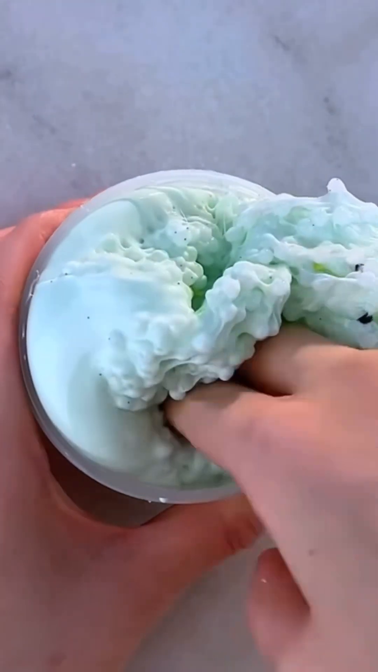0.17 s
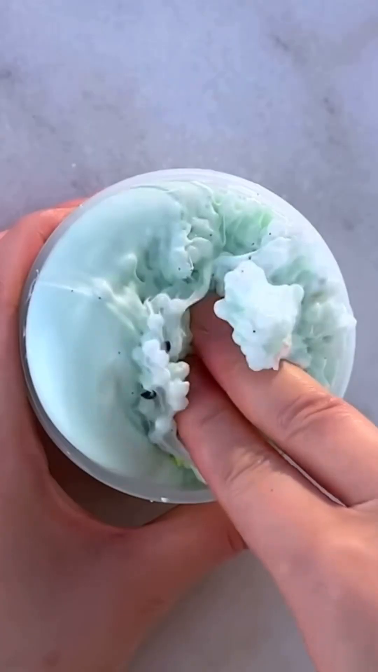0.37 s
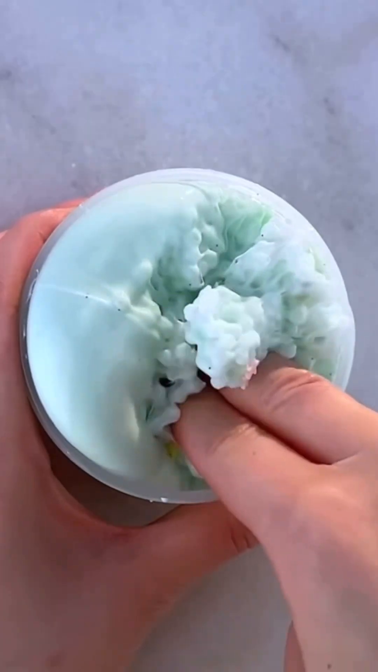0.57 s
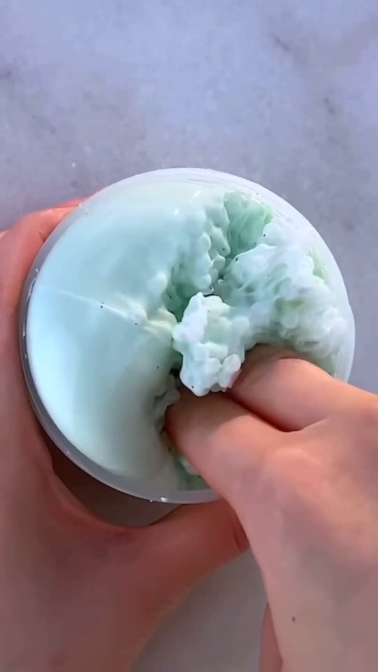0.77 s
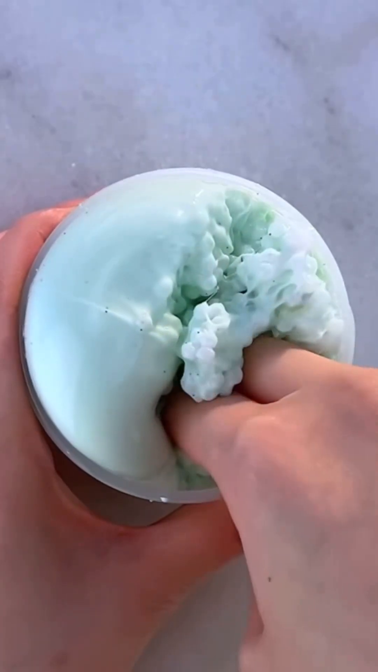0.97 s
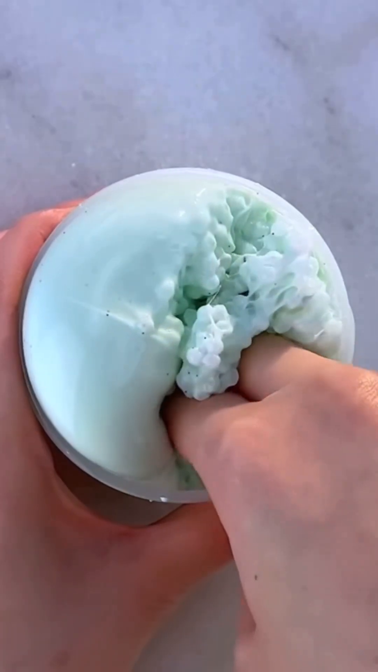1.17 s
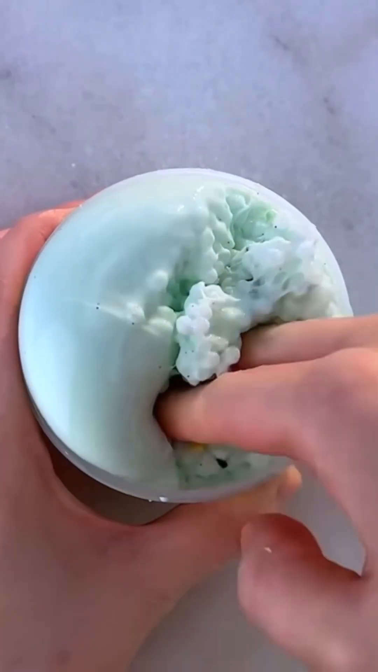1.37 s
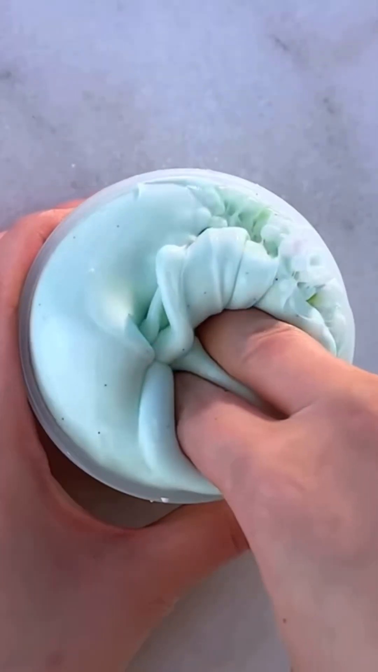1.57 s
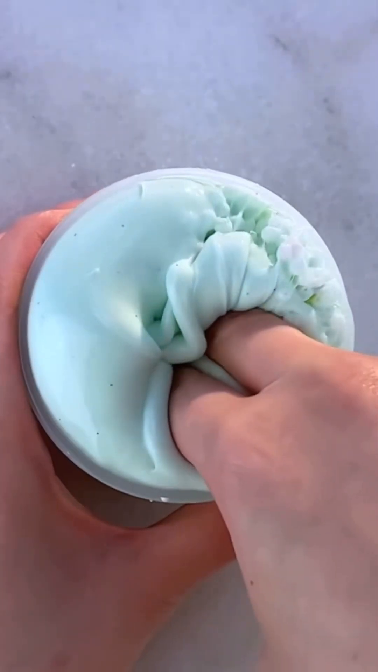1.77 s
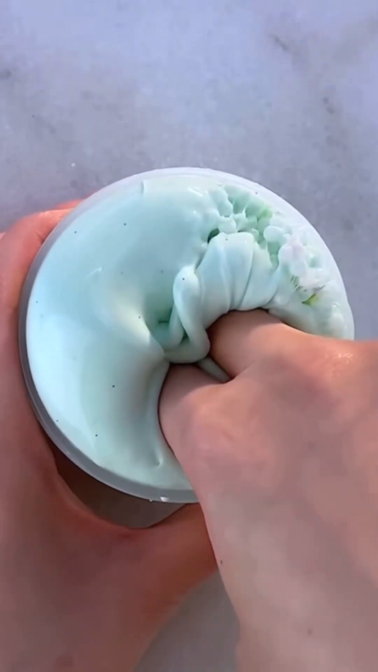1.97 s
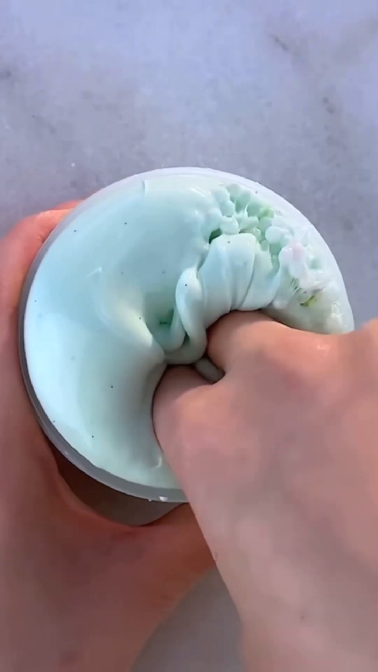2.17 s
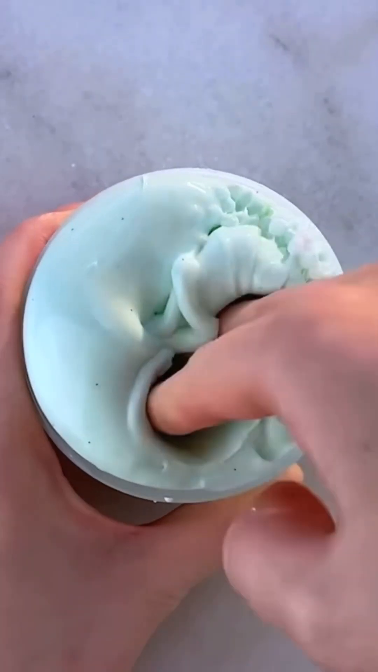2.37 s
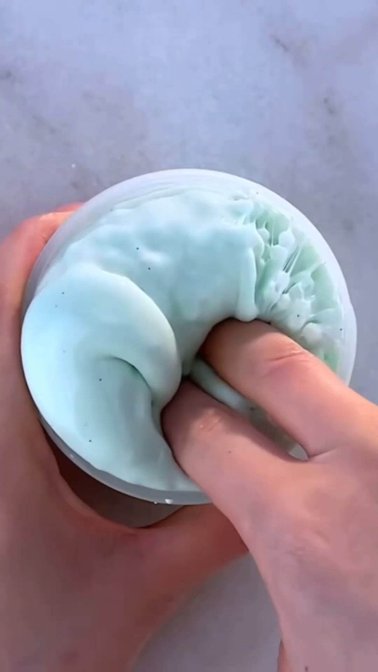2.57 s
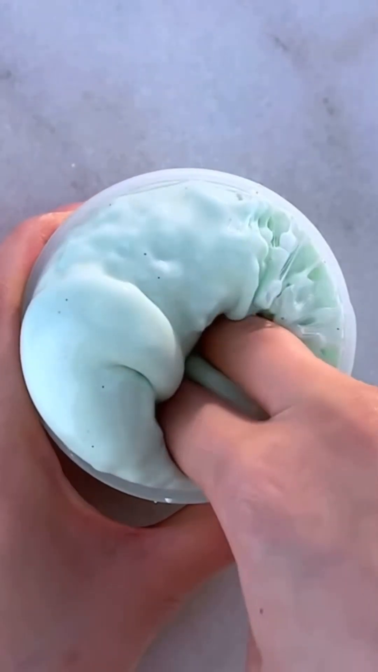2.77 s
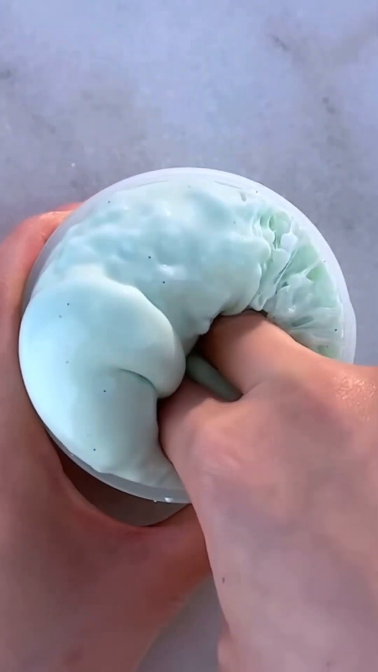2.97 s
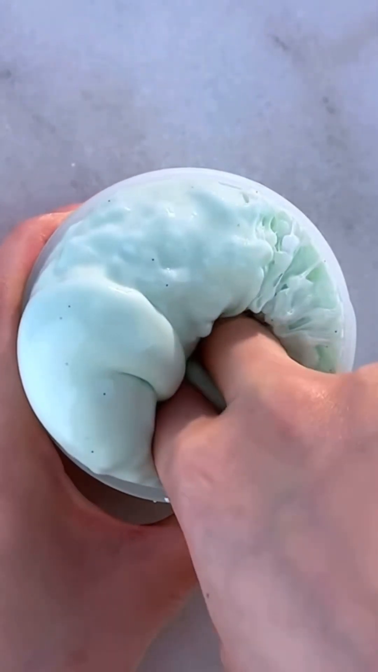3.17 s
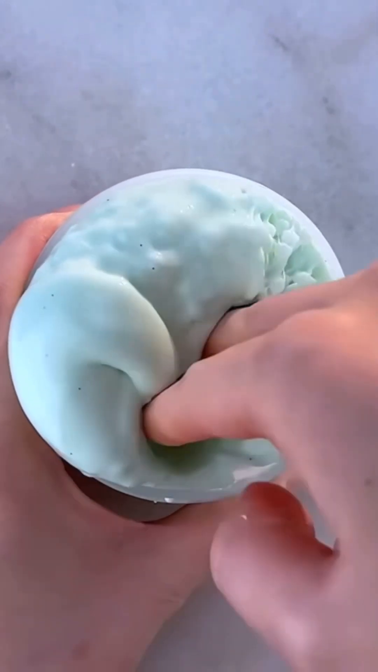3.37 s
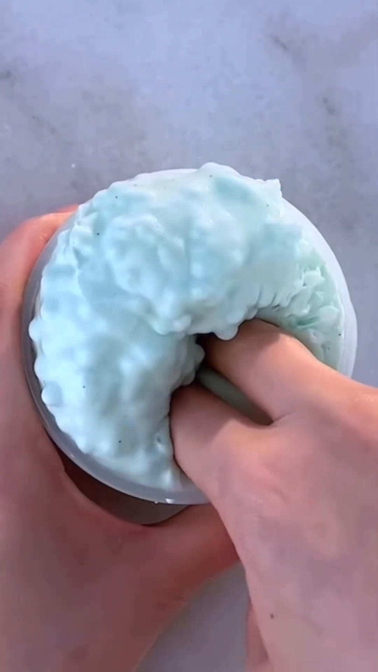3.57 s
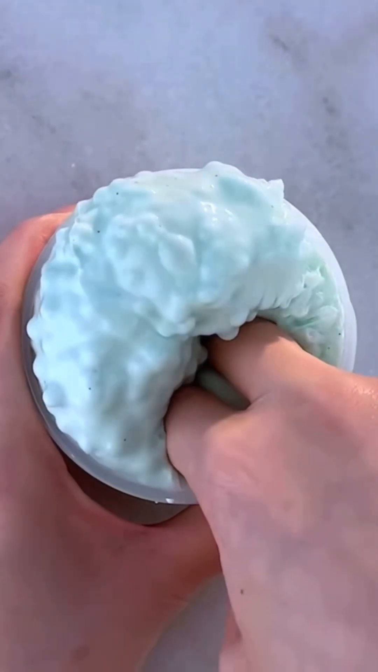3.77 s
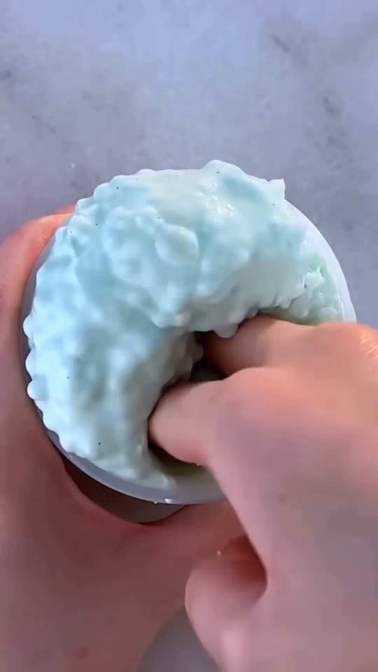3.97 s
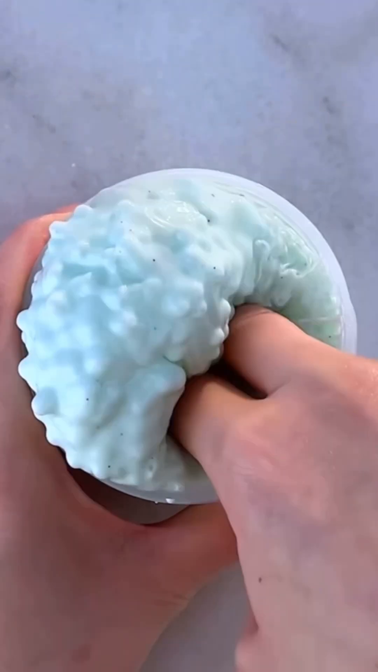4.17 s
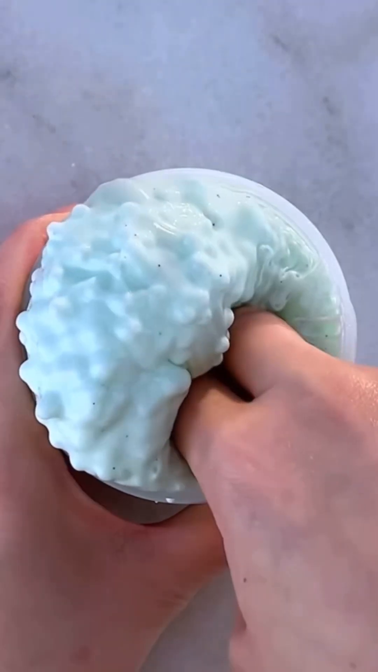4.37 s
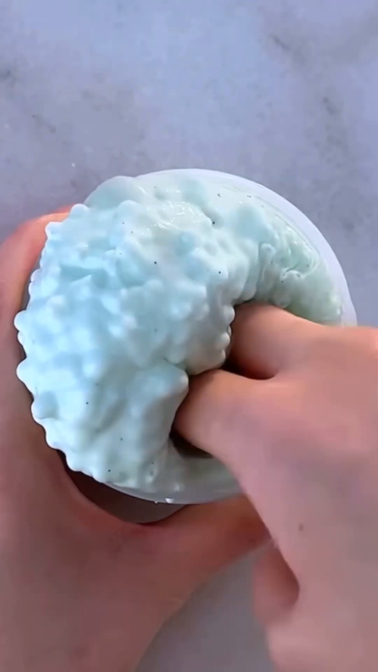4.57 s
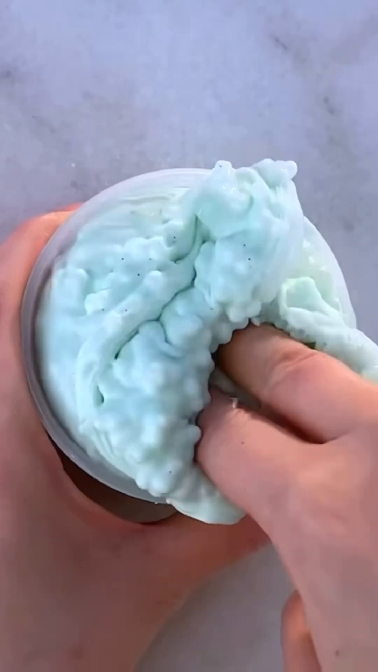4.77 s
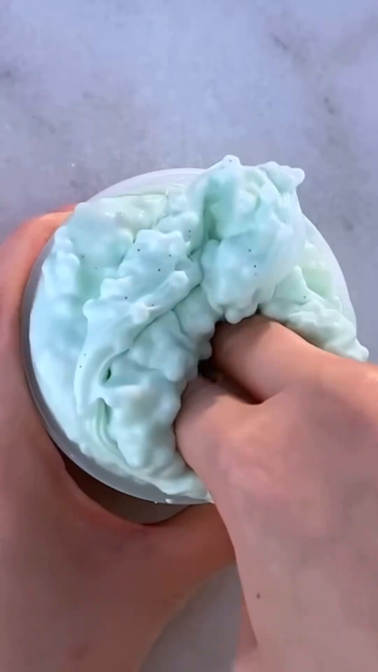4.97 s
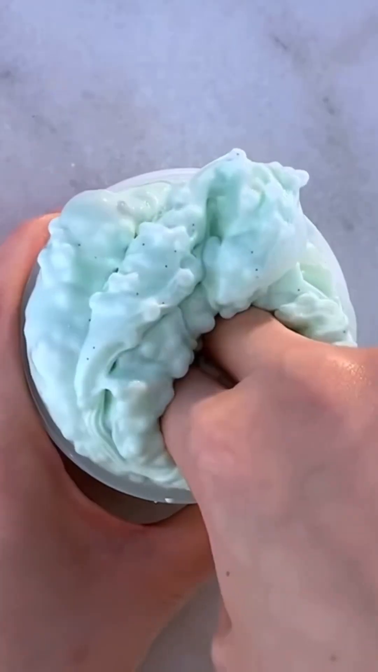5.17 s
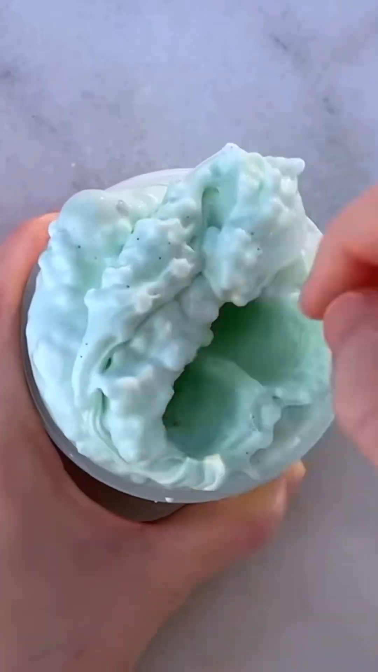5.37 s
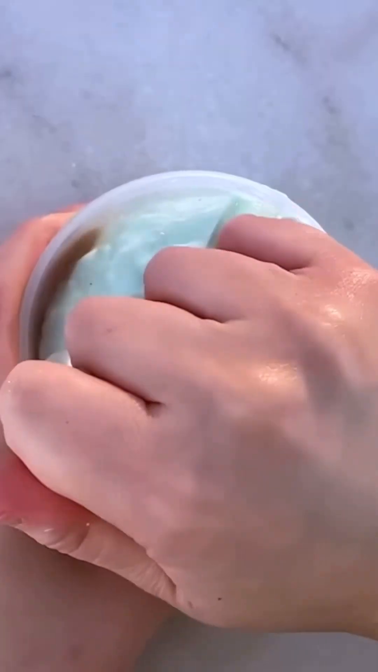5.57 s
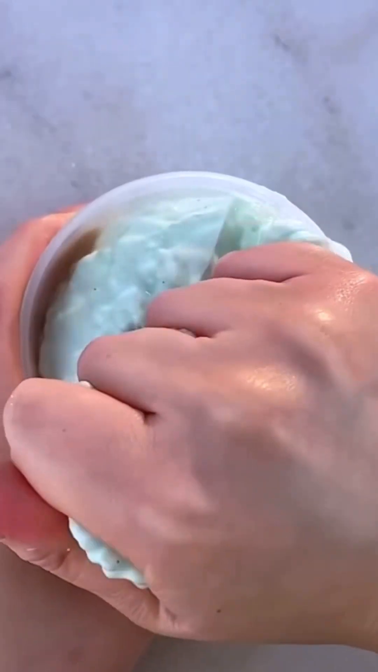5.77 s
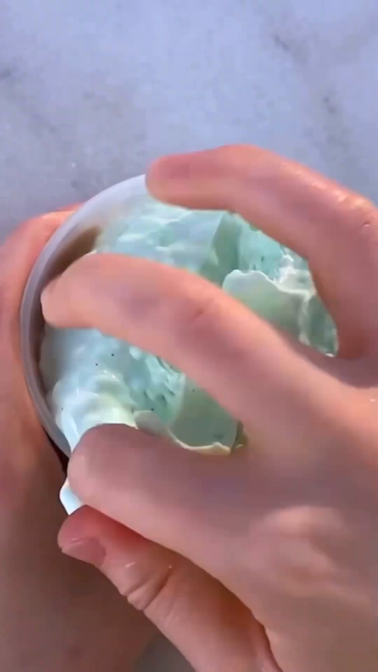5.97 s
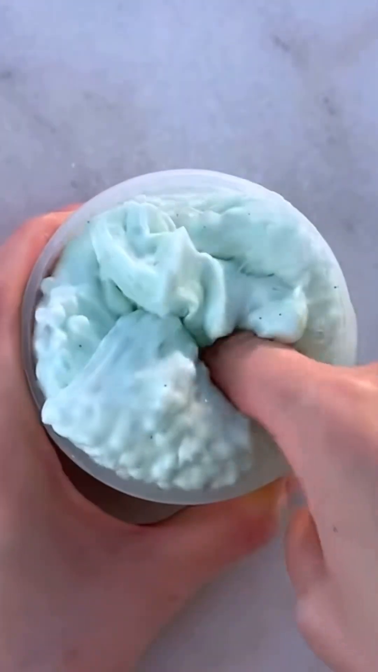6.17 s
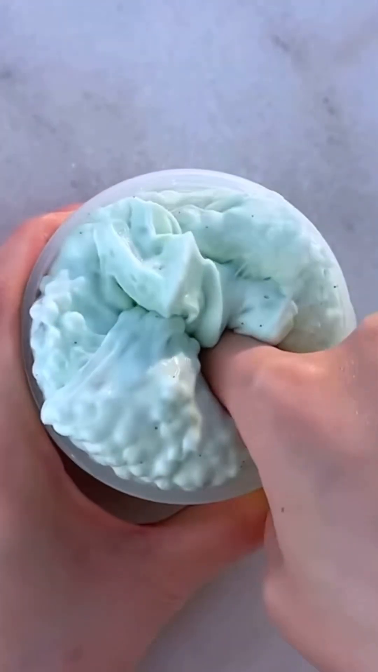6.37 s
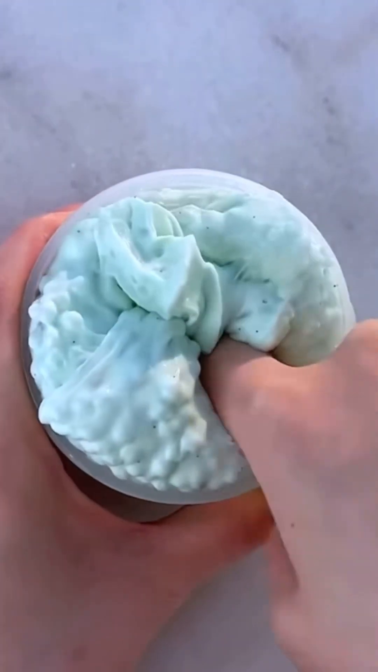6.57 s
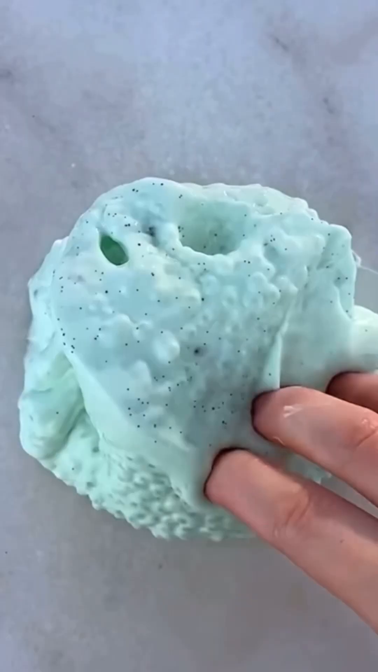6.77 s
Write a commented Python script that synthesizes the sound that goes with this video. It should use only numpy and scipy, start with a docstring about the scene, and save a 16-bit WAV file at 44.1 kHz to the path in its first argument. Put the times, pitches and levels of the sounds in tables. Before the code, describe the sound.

Close, wet slime pressing: bubbly crackling first, sparse ticks, then loud air pops with gurgles, ending in a dense bright crunch and a last squelch.

```python
"""In a small room, fingers knead a tub of thick slime close to a pair of microphone ports.
Each push squeezes air out: random tiny snaps pass through resonances as a gurgle, a squelch and a fizz.
Trapped pockets burst in short ringing tones and sprays of snaps, and small bubbles click and crackle.
Short grainy swells and dull thuds join in, over a rumble, a drone, a low hum and quiet room air."""
import sys
import numpy as np
from scipy import signal
from scipy.fft import rfft, irfft, next_fast_len
from scipy.io import wavfile
from scipy.ndimage import uniform_filter1d

SR = 44100
rng = np.random.default_rng(int(sys.argv[2]) if len(sys.argv) > 2 else 0)


def master_out(mix):
    """Clip the mix to full scale and print it as 16-bit PCM to the path in sys.argv[1]."""
    frames = np.transpose(np.atleast_2d(mix))
    ceiling = np.clip(frames, -1, 1)
    pcm = np.round(ceiling * 32767).astype(np.int16)
    wavfile.write(sys.argv[1], SR, pcm)


N = 300321
TIME = np.arange(N) / SR  # seconds


def amp(db):
    """Turns decibels into a gain."""
    return 10 ** (np.asarray(db) / 20)


def unit(x):
    """Scales a sound to rms 1."""
    return x / np.sqrt(np.mean(x ** 2) + 1e-20)


def read(points, hz):
    """Reads a table between its points, on a logarithmic frequency axis."""
    table_hz, value = np.transpose(points)
    return np.interp(np.log(hz + 1), np.log(table_hz + 1), value)


def add(mix, start_s, sound):
    """Mixes a sound in at a start time."""
    part = mix[..., max(round(start_s * SR), 0):][..., :sound.shape[-1]]
    part += sound[..., :part.shape[-1]]


def colour(x, spectrum, tilt=0, size=4096):
    """Filters with a spectrum, tilted in dB per octave; the filter has unit energy and never rings early."""
    hz = abs(np.fft.fftfreq(size, 1 / SR))
    gain_db = read(spectrum, hz) + tilt * np.log2(1 + hz / 500)
    log_gain = np.log(amp(gain_db))
    # the Hilbert transform finds the phase that lets the filter respond as early as possible
    response = np.exp(np.conj(signal.hilbert(log_gain)))
    taps = np.fft.ifft(response).real[:size // 2]
    taps = taps / np.linalg.norm(taps)
    return signal.oaconvolve(x, taps[None], axes=1)[:, :x.shape[1]]


def pair(z, spread):
    """Makes left and right from a shared signal z[0] and a share of an opposed one z[1]."""
    left, right = z[0] + spread * z[1], z[0] - spread * z[1]
    return np.array([left, right]) / np.sqrt(1 + spread ** 2)


def wander(count, hz):
    """Smooth random curve of rms 1 that moves at up to about hz."""
    size = next_fast_len(count)
    f = np.fft.rfftfreq(size, 1 / SR)
    smooth = rfft(rng.standard_normal(size)) * np.exp(-(f / hz) ** 2)
    return unit(irfft(smooth, size)[:count])


def grains(count, per_s, size_db, spread):
    """A random train of tiny snaps, few large and many small, each from its own direction."""
    chance, size, sign, side = rng.random((4, count))
    happens = chance < per_s / SR
    loudness = amp(size_db * np.minimum(-np.log(size + 1e-9), 4))
    train = happens * np.sign(sign - .5) * loudness
    return unit(pair([train, train * np.cos(2 * np.pi * side)], spread))


def resonate(x, hz, width):
    """Shifts the pitch hz down to zero, smooths twice and shifts back: a resonance that can move."""
    turn = np.exp(2j * np.pi * np.cumsum(hz) / SR)
    r = np.exp(-np.pi * width / SR)
    smooth = signal.lfilter([(1 - r) ** 2], [1, -2 * r, r * r], x / turn)
    return unit((turn * smooth).real)


def cavities(x, modes, drift, flutter_db, flutter_hz):
    """Soft cavities that change shape: each resonance drifts and swells on its own."""
    total = 0
    for hz, width, db in modes:
        swell = amp(db + flutter_db * wander(N, flutter_hz))
        pitch = hz * (1 + drift * wander(N, flutter_hz / 3))
        total = total + swell * resonate(x, pitch, width)
    return unit(total)


def gesture(start, end, rise_db_per_s, fall_db_per_s, sag_db_per_s=0):
    """Gain of one hand move: it builds up to start, holds or sags, and falls faster after end."""
    early, since, late = np.maximum([start - TIME, TIME - start, TIME - end], 0)
    drop_db = rise_db_per_s * early + sag_db_per_s * since + fall_db_per_s * late
    return amp(-np.minimum(drop_db, 200))


# spectrum of the quiet room air: (frequency_hz, strength_db)
AIR_SPECTRUM = [(20, -8.5), (50, 2), (80, -3.5), (300, -20.5), (700, -27.5), (1200, -31), (2300, -39.5),
                (3500, -40), (6000, -44.5), (12500, -38), (16000, -58)]


def ambience(hum_hz=57.8, hum_db=-44, air_db=-50):
    """Room air is filtered noise; the low hum is a sine whose phase and level waver."""
    phase = 2 * np.pi * hum_hz * TIME + 0.55 * wander(N, 1.7)
    hum = np.sin(phase) * (1 + .35 * wander(N, 7.3))
    air = colour(pair(rng.standard_normal((2, N)), 0.33), AIR_SPECTRUM)
    return amp(hum_db) * hum + amp(air_db) * air


# spectrum of the rumbling tub: (frequency_hz, strength_db)
RUMBLE_SPECTRUM = [(20, -12.5), (45, 0.5), (90, 3.5), (150, -2), (200, -9), (300, -14), (450, -20),
                   (700, -23), (1200, -43), (4000, -70.5)]
# resonances of the low drone: (pitch_hz, width_hz, level_db)
DRONE_RESONANCES = [(252.6, 57, -2.5), (380.3, 45, -10)]
# rumble between shoves: (time_s, level_db)
RUMBLE_CURVE = [(0, -50.5), (.55, -41.5), (1.75, -42.5), (2.7, -44.5), (3.65, -52.5), (4.4, -47),
                (5.1, -54), (5.6, -47.5), (6.35, -52), (6.81, -44.5)]
# how the drone comes and goes: (time_s, level_db)
DRONE_CURVE = [(0, -59), (.7, -47), (1.35, -48.5), (1.75, -41.5), (2.2, -49.5), (2.5, -57), (4, -54),
               (5.1, -66.5), (5.62, -50), (6.4, -61), (6.81, -57)]
PRESS_DB_PER_S = 700.5  # how fast the push builds, in air flow and in shove
SHOVE_LAG_S, SHOVE_RELEASE_DB_PER_S = 0.0087, 150.5  # the heavy mass follows late and settles slowly


def rumble():
    """The held tub rumbles as low noise, more with each shove; resonances in noise make a drone."""
    force = amp(np.interp(TIME, *np.transpose(RUMBLE_CURVE)))
    for start, hold, *_, shove_db in FINGER_PUSHES:
        late = start + SHOVE_LAG_S
        force += amp(shove_db) * gesture(late, late + hold, PRESS_DB_PER_S, SHOVE_RELEASE_DB_PER_S)
    shoves = colour(pair(rng.standard_normal((2, N)), 0.39), RUMBLE_SPECTRUM)
    drone_noise = pair(rng.standard_normal((2, N)), 0.17)
    drone = cavities(drone_noise, DRONE_RESONANCES, drift=0.04, flutter_db=2.0, flutter_hz=14)
    return shoves * force + drone * amp(np.interp(TIME, *np.transpose(DRONE_CURVE)))


# pulls on the sticky surface: (start_s, end_s, crackle_db, sizzle_db, slackening_db_per_s)
SURFACE_PULLS = [(0, .04, -65, -69, 5.5), (0.382, 1.095, -38.5, -42.5, 16.5),
                 (1.474, 1.97, -59.5, -72.5, 44), (2.178, 2.28, -62.5, -51, 10),
                 (2.594, 2.906, -60, -57.5, 9.5), (3.171, 3.352, -62, -62, 1.5),
                 (4.243, 4.399, -60.5, -65.5, 55.5), (4.75, 5.052, -48.5, -51.5, 13),
                 (5.45, 5.55, -50.5, -65, 8), (5.592, 5.787, -37, -30.5, 9), (5.968, 6.302, -67, -58.5, 27)]
# spectrum of the tiny ticks: (frequency_hz, strength_db)
CRACKLE_SPECTRUM = [(100, -28.5), (900, -14), (1600, 2.5), (2600, 0), (4000, -2), (6000, -1), (9000, -11.5),
                    (12500, 3), (14500, -7.5), (17000, -16.5)]
# spectrum of a single snap, also used by the clicks: (frequency_hz, strength_db)
SNAP_SPECTRUM = [(100, -23.5), (800, -11), (1800, 5.5), (4000, -2), (7000, 0.5), (12500, -0.5),
                 (15000, -14), (17000, -9)]
# spectrum of the sizzle, also used by the fizz of the pushes: (frequency_hz, strength_db)
FIZZ_SPECTRUM = [(100, -57.5), (5000, -26.5), (8000, -11.5), (10000, 5), (12500, 1), (15000, -6),
                 (17000, -13)]
# resonances of the wet gaps, also used by the pushes: (pitch_hz, width_hz, level_db)
WET_GAPS = [(1550, 360, 0.5), (3300, 2800, -0.5), (5800, 3300, -6.5)]
GRIP_DB_PER_S, LET_GO_DB_PER_S = 419.5, 241  # rise before a pull, extra fall after it
REST_CRACKLE_DB, REST_SIZZLE_DB = -72, -79.5  # the foam settling by itself


def crackle(wet_db=-7, clump_db=6.5, stray_db=-8):
    """The stretched surface lets go of the skin in clumps of ticks, wet rings, stray snaps and sizzle."""
    gains = amp([[REST_CRACKLE_DB], [REST_SIZZLE_DB]]) * np.ones(N)
    for start, end, crackle_db, sizzle_db, slackening in SURFACE_PULLS:
        pull = gesture(start, end, GRIP_DB_PER_S, LET_GO_DB_PER_S, slackening)
        gains += amp([[crackle_db], [sizzle_db]]) * pull
    clumps = amp(clump_db * wander(N, 50))
    ticks = unit(colour(grains(N, per_s=600, size_db=4.5, spread=.6) * clumps, CRACKLE_SPECTRUM))
    wet_snaps = grains(N, per_s=400, size_db=0.5, spread=0.7)
    wet = cavities(wet_snaps, WET_GAPS[1:], drift=.2, flutter_db=7.5, flutter_hz=80)
    stray = colour(grains(N, per_s=45, size_db=2.5, spread=.6), SNAP_SPECTRUM, tilt=2)
    sizzle = unit(colour(grains(N, per_s=1000, size_db=4.5, spread=0.31) * clumps, FIZZ_SPECTRUM))
    coarse = unit(ticks + amp(wet_db) * wet + amp(stray_db) * stray)
    return coarse * gains[0] + sizzle * gains[1]


# bubble snaps that stand out: (start_s, level_db averaged over one millisecond, tilt_db_per_octave)
BUBBLE_CLICKS = [(.0362, -48, 0), (.3565, -17, 9.5), (.391, -21, 7.5), (.4122, -20, 6), (.4224, -16.5, 3.5),
                 (.4307, -21.5, 0), (.4981, -22.5, 4), (.5025, -9.5, 22), (.6368, -22.5, 0),
                 (.6391, -18, 0.5), (.6947, -17.5, -3.5), (.7591, -27.5, 2), (.8046, -31.5, 3),
                 (.8751, -27.5, 10.5), (0.8236, -33.5, -5), (0.857, -33, 4), (.9188, -28, -3),
                 (1.0222, -33, 5), (1.0782, -32.5, 5.5), (1.197, -39, -1), (1.4824, -21.5, -1.8),
                 (1.5898, -40, -1), (1.7563, -37.5, -19.5), (1.8821, -38.5, -21), (2.0889, -28, 4.5),
                 (2.1859, -27, -11.5), (2.6262, -39.5, -1), (2.6386, -40, -3), (2.6792, -20, 17.5),
                 (2.7729, -31.5, 10), (2.8295, -37.5, 13), (2.8514, -32, -4.5), (2.906, -30.5, 11),
                 (3.177, -44.5, 7), (3.5617, -45, -3), (3.7147, -46.5, -5), (4.198, -41.5, -0.5),
                 (4.247, -32.5, 5), (4.4953, -20.5, 2), (4.7537, -27.5, 2), (4.9169, -28, 5.5),
                 (4.9624, -23, -8), (5.0133, -29, 14), (5.0696, -27.5, 8), (5.2106, -27, -7.5),
                 (5.5105, -5, 8), (5.6573, -9, 18.5), (5.6808, -7.5, 7), (6.0305, -38, 9),
                 (6.1448, -21, 14.5), (6.79, -15.5, 13.5)]


def clicks(spit=0.92):
    """A small bubble snaps as one impulse and spits a brief burst of noise, each with its own brightness."""
    out, t = np.zeros((2, N)), TIME[:SR // 40]
    fade = np.exp(-t / .0004)
    for start, db, tilt in BUBBLE_CLICKS:
        spray = pair(rng.standard_normal((2, len(t))), 0.41) * fade
        snap = colour((t == 0) + spit * spray, SNAP_SPECTRUM, tilt)
        add(out, start, amp(db) * snap / np.linalg.norm(snap[0]))
    return out * np.sqrt(SR / 1000)  # energy of one millisecond


# pushes of the fingers, start being full pressure:
# (start_s, hold_s, release_db_per_s, gurgle_db, squelch_db, fizz_db, shove_db)
FINGER_PUSHES = [(0.115, 0.082, 520, -45.5, -39.5, -40, -59), (1.279, 0.094, 510, -45, -39, -36, -46),
                 (2.283, 0.071, 254, -35.5, -39.5, -37, -40), (3.294, 0.056, 227, -24, -38.5, -32.5, -29.5),
                 (3.987, 0.023, 270, -25.5, -29, -29.5, -32), (4.503, 0.081, 378, -32, -34, -35, -43),
                 (5.235, 0.049, 520, -31, -28, -27, -39), (5.878, 0.06, 421, -40, -25, -25.5, -43),
                 (6.634, 0.021, 447, -25, -26.5, -26, -39)]
# resonances of the gurgle: (pitch_hz, width_hz, level_db)
GURGLE_RESONANCES = [(430, 250, -0.77), (663, 210, -0.23)]
# spectrum of the rasp in the squelch: (frequency_hz, strength_db)
SQUELCH_SPECTRUM = [(100, -19.5), (600, -7.5), (1100, -4), (2200, -1.5), (4500, -8), (7000, -3.5),
                    (9500, -25), (16000, -39.5)]
GURGLE_SAG_DB_PER_S = 90.5  # the large gaps close first


def pushes(flutter_db=1.5, gaps_db=-6, rasp_db=-3):
    """Air sputters through wet gaps beside the fingers: a gurgle, a squelch and a fine fizz on top."""
    gains = np.zeros((3, N))
    for start, hold, release, gurgle_db, squelch_db, fizz_db, _ in FINGER_PUSHES:
        end = start + hold
        flow = gesture(start, end, PRESS_DB_PER_S, release)
        sagging_flow = gesture(start, end, PRESS_DB_PER_S, release, GURGLE_SAG_DB_PER_S)
        gains[0] += amp(gurgle_db) * sagging_flow
        gains[1:] += amp([[squelch_db], [fizz_db]]) * flow
    sputter = grains(N, per_s=2800, size_db=5.0, spread=.55)
    gurgle = cavities(sputter, GURGLE_RESONANCES, drift=.12, flutter_db=5, flutter_hz=60)
    gaps = cavities(sputter, WET_GAPS, drift=0.079, flutter_db=3.5, flutter_hz=49.7)
    rasp = colour(grains(N, per_s=3500, size_db=2.5, spread=0.38), SQUELCH_SPECTRUM)
    squelch = amp(gaps_db) * gaps + amp(rasp_db) * rasp
    fizz = colour(grains(N, per_s=15000, size_db=5.5, spread=0.08), FIZZ_SPECTRUM)
    flutter = amp(flutter_db * wander(N, 110))
    return (gurgle * gains[0] + squelch * gains[1] + fizz * gains[2]) * flutter


# short grainy swells: soft squishes, and the tub's hollow ring after the big bursts;
# each lasts from length_s before the middle to length_s after:
# (middle_s, level_db, pitch_hz, width_hz, length_s)
GRAINY_SWELLS = [(0.165, -40.5, 1600, 1300, .08), (.663, -34.5, 3000, 1800, .027),
                 (1.761, -57.5, 2000, 1200, .04), (1.898, -59, 1570, 1000, .046),
                 (2.366, -43.5, 1550, 250, .06), (3.08, -56.5, 1670, 1003, .053),
                 (3.366, -36, 1550, 250, .05), (3.421, -48.5, 3200, 1410, .11),
                 (4.034, -37, 1720, 335, .05), (4.1, -55, 1525, 230, .06), (4.108, -49, 4720, 2480, .11),
                 (4.854, -40, 2660, 2440, .054), (5.294, -30.5, 1700, 1500, .019),
                 (6.644, -22, 3460, 1460, .02)]


def swells(spread=0.846):
    """Tiny snaps through one resonance swell and fade: a soft squish, or the tub's hollow ring."""
    out = np.zeros((2, N))
    for middle, db, hz, width, length in GRAINY_SWELLS:
        count = round(2 * length * SR)
        snaps = grains(count, per_s=1000, size_db=2, spread=spread)
        rasp = resonate(snaps, np.full(count, hz), width)
        add(out, middle - length, amp(db) * rasp * np.hanning(count))
    return out


def pocket_tone(db, hz, decay, rise, rough=0.28, waver=.1, attack=0.00017):
    """One tone of a cavity whose wall gives way; the flapping opening shakes pitch and level."""
    t = TIME[:4096]
    climb = 2 ** (rise * (1 - np.exp(-t / (2 * decay))))
    pitch = hz * climb * (1 + waver * wander(len(t), hz / 3))
    ring = np.sin(2 * np.pi * np.cumsum(pitch) / SR) * (1 + rough * wander(len(t), hz / 4))
    ring *= np.exp(-t / decay) * (1 - np.exp(-t / attack))
    # a small opening radiates little below its own pitch
    return amp(db) * signal.lfilter(*signal.butter(2, hz / 2, "high", fs=SR), ring)


# ringing tones of bursting air pockets, several to a large burst:
# (start_s, level_db before shaping, pitch_hz at the start, decay_s)
POCKET_TONES = [(.692, -11, 2600, 0.00031), (.754, 3.5, 2220, 0.00023), (2.2207, -0.5, 910, 0.0016),
                (2.2224, 1.5, 2258, 0.011), (2.228, -3, 2514, 0.0055), (2.269, -2, 3190, 0.0019),
                (2.340, -22.5, 755, 0.0076), (3.2573, 0.5, 2438, 0.0082), (3.257, -10.5, 692, 0.009),
                (3.2575, -3.5, 3266, 0.012), (3.285, -8.5, 3410, .008), (3.2865, -5.5, 750, 0.0032),
                (3.288, -2.5, 408, .0052), (3.348, -13.5, 575, 0.0076), (3.943, -2, 4910, 0.014),
                (3.944, -8.5, 400, 0.0045), (3.9712, -0.5, 1550, .0035), (3.972, -11, 840, 0.0042),
                (3.9727, -6.5, 420, 0.0051), (4.8442, -9, 2940, 0.00055), (4.961, -5.5, 2510, 0.00044),
                (5.881, -9, 2750, .004), (6.623, -9, 625, 0.0027), (6.6397, -20.5, 430, 0.009),
                (6.641, -13.5, 850, 0.0045), (6.641, -14.5, 2900, 0.0064)]
POCKET_RISE_OCTAVES = 0.12  # a cavity shrinks as it empties, so its pitch climbs


def pockets(spread=0.45):
    """Bursting air pockets ring, several tones to a large burst, each tone with its own direction."""
    out = np.zeros((2, N))
    for start, db, hz, decay in POCKET_TONES:
        front, side = (pocket_tone(db, hz, decay, POCKET_RISE_OCTAVES) for _ in range(2))
        direction = np.cos(2 * np.pi * rng.random())
        add(out, start, pair([front, direction * side], spread))
    return out


# films tearing in a spray of tiny snaps: (start_s, level_db, decay_s, tilt_db_per_octave)
FILM_TEARS = [(1.479, -27, 0.0056, 5), (2.214, -16, 0.0071, 5), (2.2225, -3, .007, -3),
              (2.2643, -13.5, 0.0063, -3), (2.269, -9, 0.0044, -4.5), (3.2562, -5.5, 0.01087, -2),
              (3.286, -10, 0.01, -3), (3.9425, -5, 0.0094, 0), (3.9705, -4, .006, -2.5),
              (4.52, -19, 0.0059, 0.5), (4.7175, -22.5, 0.0063, 3), (5.2443, -36, 0.0069, 11),
              (5.2509, -20.5, .009, -5.5), (5.439, -13.5, 0.0065, -0.5), (5.483, -22.5, 0.011, -0.5),
              (5.51, -14, 0.0067, 3.5), (5.5631, -5.5, 0.011, 5.5), (5.572, -3.5, .007, 14.5),
              (5.5867, -6.5, .002, 11), (5.6157, -2, 0.0098, 10), (5.672, -18.5, .005, -1.5),
              (5.6807, -9, 0.0053, 13), (5.741, -2.5, 0.007, 5), (5.881, -18, 0.0088, -1),
              (6.621, -4, 0.00213, -2), (6.640, -19, 0.0075, -6)]
# spectrum of the spray: (frequency_hz, strength_db)
TEAR_SPECTRUM = [(60, -13), (300, -7), (1200, -1.5), (3000, 0), (6000, -1), (9000, -2.5), (12500, -0.5),
                 (14500, -9.5), (17000, -18)]


def tears(edge=.0004, lead_db=-17, lead=0.0059):
    """A spray of many tiny snaps within a few milliseconds, with a faint short rise before it."""
    out, t = np.zeros((2, N)), TIME[:SR // 8] - TIME[SR // 50]  # zero is the start of the spray
    for start, db, decay, tilt in FILM_TEARS:
        faint_rise = amp(lead_db) * np.exp(-abs(t) / lead)
        burst = np.exp(-abs(t) / decay) * (1 - np.exp(-abs(t) / edge))
        swell = np.where(t < 0, faint_rise, burst)
        spray = grains(len(t), per_s=15000, size_db=4.5, spread=0.63) * swell
        add(out, start + t[0], amp(db) * colour(spray, TEAR_SPECTRUM, tilt))
    return out


# the mass of slime shoved against the tub: (start_s, level_db before fading, pitch_hz, decay_s)
SLIME_THUDS = [(2.224, -20.5, 63.36, 0.042), (2.27, -29.5, 153.7, 0.0086), (3.288, -20, 140.2, 0.019),
               (3.292, -12, 353.7, 0.0072), (3.324, -24.5, 60, 0.065), (3.989, -24.5, 107.4, 0.041),
               (5.256, -21.5, 83.4, 0.023), (5.259, -27.5, 372.6, 0.012), (5.31, -19, 75, 0.016),
               (5.985, -23, 78, 0.017), (6.69, -26.5, 72, 0.026)]


def thuds():
    """Dull, quickly damped wobbles of the whole mass: low sines with a wavering pitch."""
    out, t = np.zeros((2, N)), TIME[:SR // 4]
    for start, db, hz, decay in SLIME_THUDS:
        pitch = hz * (1 + 0.048 * wander(len(t), 40))
        wobble = np.sin(2 * np.pi * np.cumsum(pitch) / SR)
        add(out, start, amp(db) * wobble * np.exp(-t / decay) * (1 - np.exp(-t * hz)))
    return out


def reflections(x, t60, delay):
    """Echoes blur into a noise tail whose bands die at their own speeds; it fades in around delay."""
    hz, t, z = signal.stft(rng.standard_normal((2, SR // 2)), SR, nperseg=256)
    # each band falls by 60 dB in its own t60
    decay = np.exp(-np.log(1000) * t / read(t60, hz)[:, None])
    tail = signal.istft(z * decay, SR)[1]
    fade_in = np.clip(np.arange(tail.shape[1]) / SR / delay - .5, 0, 1)
    tail = pair(tail, 0.67) * fade_in
    return signal.oaconvolve(x, tail / np.linalg.norm(tail[0]), axes=1)[:, :N]


# phase between the two ports: (frequency_hz, left_lead_radians)
LEFT_LEAD = [(20, 0), (380, 0), (780, 1), (1300, .25), (2400, .8), (3000, 1.25), (4000, .3), (5100, .4),
             (5800, -1), (7100, -1.4), (7750, -3.1), (10000, -3.4), (11700, -5.6), (12400, -6.3),
             (16000, -6.3)]
# level between the two ports: (frequency_hz, left_minus_right_db)
LEFT_BALANCE = [(20, -0.5), (500, 1.5), (1300, 4), (2400, 2), (4400, 3.5), (8000, 0.5), (16000, 1)]


def ports(x):
    """The two microphone ports differ in phase and level; each takes half of the difference."""
    size = next_fast_len(N + SR // 10)
    hz = np.fft.rfftfreq(size, 1 / SR)
    half = np.exp(.5j * read(LEFT_LEAD, hz)) * amp(read(LEFT_BALANCE, hz) / 2)
    return irfft(rfft(x, size) * np.array([half, 1 / half]), size)[:, :N]


# how long the room takes to fall by 60 dB: (frequency_hz, t60_s)
ROOM_DECAY = [(250, 0.23), (700, 0.13), (1700, 0.25), (4500, 0.33), (12000, 0.073)]


def scene():
    """Slime sounds, thrown back at once by tub and table and later by the room."""
    small, large = clicks() + crackle(), pockets() + tears()
    near_send = amp(-5) * small + amp(-11.5) * large
    near = reflections(near_send, [(300, 0.11), (12000, 0.08)], delay=0.0004)
    far_send = amp(-25.0) * small + amp(-18.5) * large
    far = reflections(far_send, ROOM_DECAY, delay=0.0092)
    slime = small + large + pushes() + swells() + thuds()
    return ports(slime + near + far + rumble() + ambience())


# the sound cuts out briefly: (start_s, end_s)
SILENT_BREAKS = [(.320, .329), (1.468, 1.477), (2.508, 2.518), (3.5, 3.512), (4.18, 4.188), (4.701, 4.715),
                 (5.427, 5.436), (6.020, 6.028), (6.771, 6.780)]
EDGE_HZ = 16100  # little is left above this


def record(dry):
    """The loudest bursts overload the input and flatten; brief dropouts follow, then the treble limit."""
    live = np.ones(N)
    for start, end in SILENT_BREAKS:
        live[round(start * SR):round(end * SR)] = 0
    clipped = np.clip(dry, -1, 1) * uniform_filter1d(live, size=64)  # softened break edges
    lowpass = signal.firwin(255, EDGE_HZ, window=("kaiser", 8), fs=SR)
    return signal.oaconvolve(clipped, lowpass[None], "same")


dry = scene()
out = record(dry)
master_out(out)
```